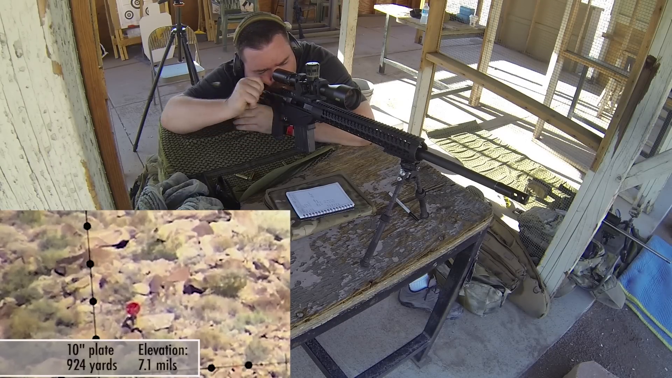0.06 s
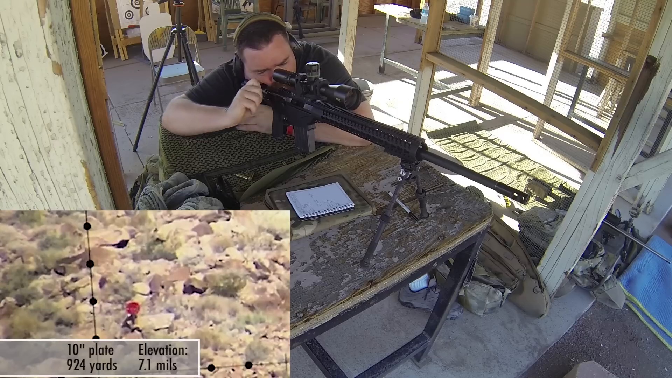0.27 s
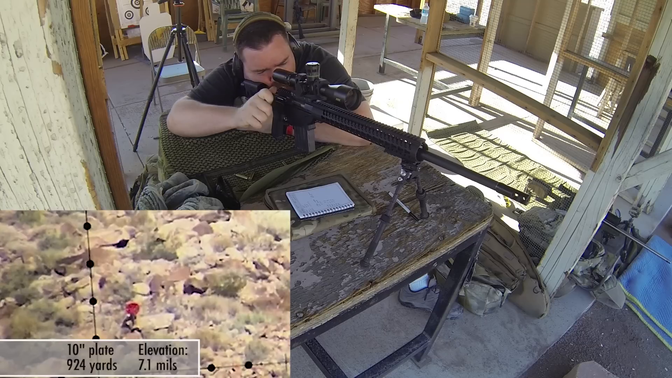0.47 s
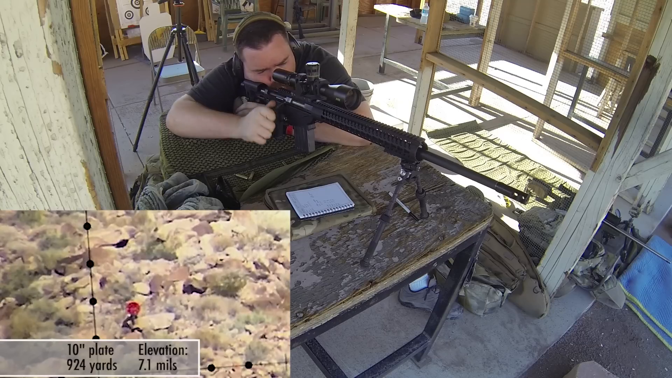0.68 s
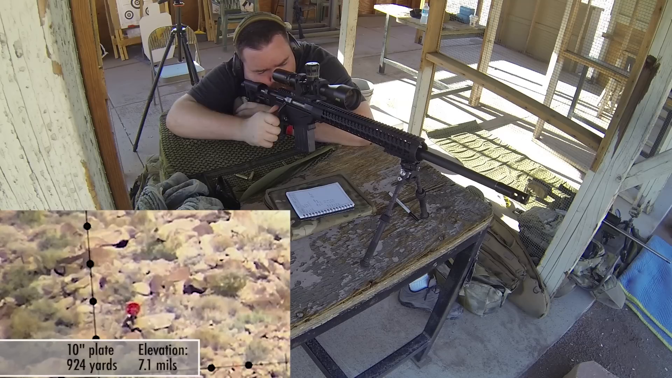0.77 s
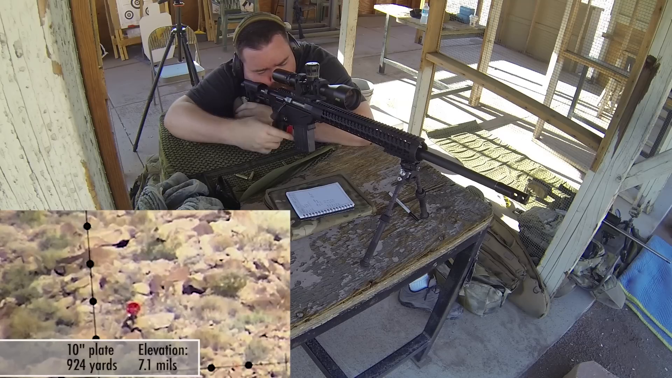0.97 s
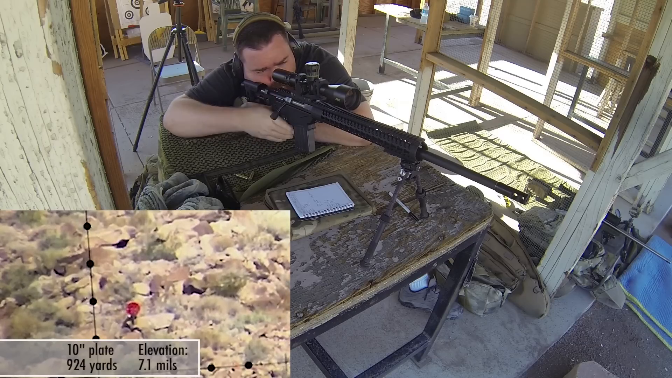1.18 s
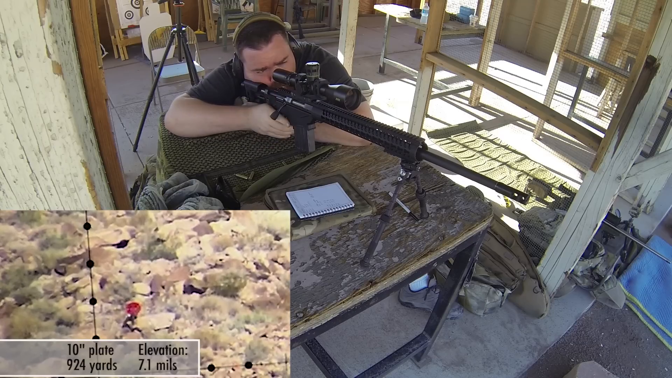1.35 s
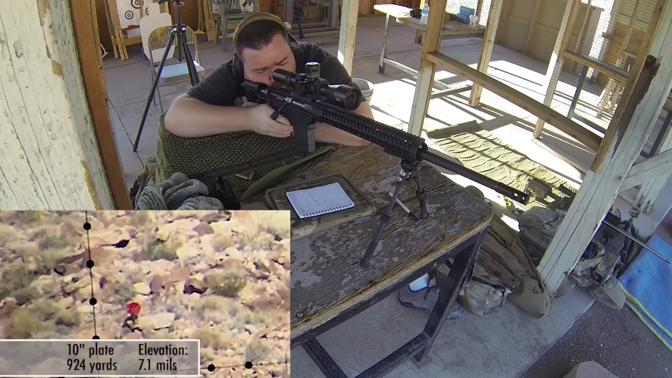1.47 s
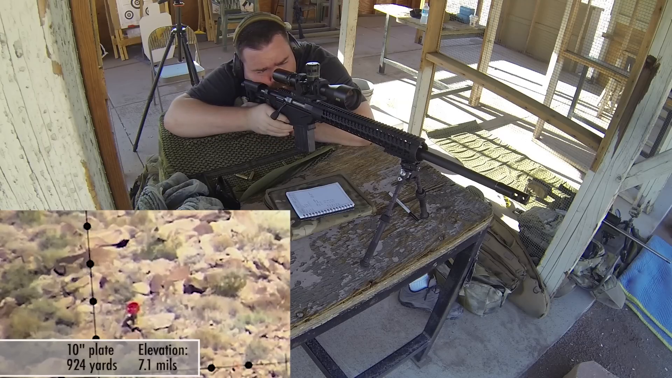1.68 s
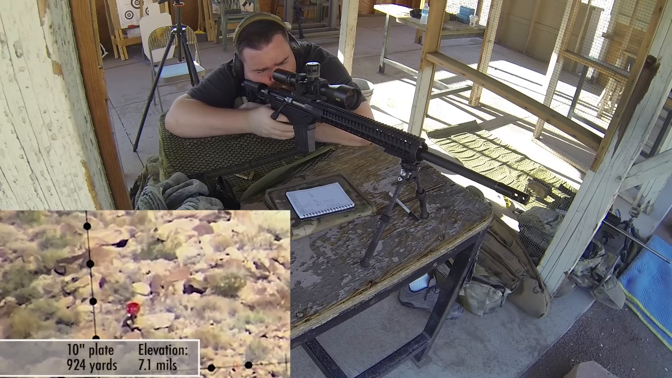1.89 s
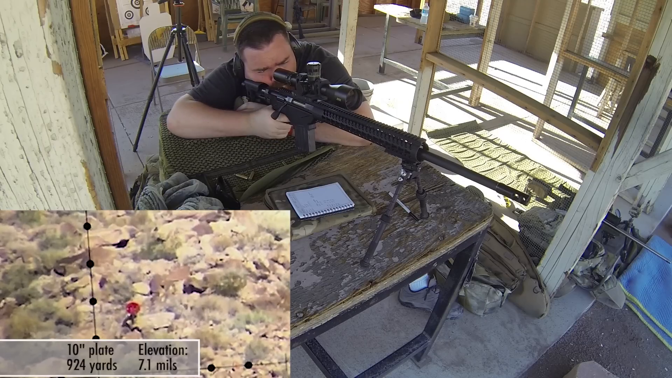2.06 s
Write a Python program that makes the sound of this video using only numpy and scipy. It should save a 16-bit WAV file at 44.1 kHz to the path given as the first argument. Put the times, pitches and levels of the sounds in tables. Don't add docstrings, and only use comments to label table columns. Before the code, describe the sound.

A rifle bolt is worked close by: steel scrapes and clacks back, then snaps home with a hard knock. An ejected brass case ticks and rings on the wooden bench, over light wind and faint insects.

```python
import sys
import numpy as np
from scipy import signal
from scipy.fft import rfft, irfft
from scipy.io import wavfile
from scipy.ndimage import uniform_filter1d

SR = 44100
rng = np.random.default_rng(int(sys.argv[2]) if len(sys.argv) > 2 else 0)


def store_pcm(level_fs):
    pcm = np.round(np.clip(level_fs, -1, 1) * 32767).astype(np.int16)
    wavfile.write(sys.argv[1], SR, np.atleast_2d(pcm).T)


def rack_gain(trim_db):
    fader = np.asarray(trim_db, float)
    return 10 ** (fader / 20)


N = 92610


def unit(x):
    return x / np.sqrt(np.mean(x ** 2))


def colour(x, points):
    point_hz, point_db = np.array(points, float).T
    hz = np.maximum(np.arange(2049) * SR / 4096, 1)
    level_db = np.interp(np.log(hz), np.log(point_hz), point_db)
    cepstrum = irfft(np.log(rack_gain(level_db)))
    cepstrum[1:2048] *= 2
    cepstrum[2049:] = 0
    response = irfft(np.exp(rfft(cepstrum)))
    return signal.fftconvolve(x, response / np.linalg.norm(response))[:N]


def ring(x, modes):
    t = np.arange(SR) / SR
    response = 0
    for hz, db, t60 in modes:
        decay = 1000. ** (-t / t60) / np.sqrt(t60)
        response = response + rack_gain(db) * np.sin(2 * np.pi * hz * t) * decay
    return signal.fftconvolve(x, response / np.linalg.norm(response))[:N]


def band(x, hz, kind):
    return signal.sosfilt(signal.butter(2, hz, kind, fs=SR, output="sos"), x)


def walk(rate_hz):
    hold = int(SR / rate_hz)
    steps = np.repeat(rng.standard_normal(N // hold + 1), hold)
    smooth = uniform_filter1d(uniform_filter1d(steps, hold), hold)
    return unit(smooth[:N])


def chatter(rows, attack_s, grit_db):
    t = np.arange(N) / SR
    unevenness = np.minimum(rng.exponential(size=N), 3)
    clicks = unit(rng.standard_normal(N) * rack_gain(grit_db * unevenness))
    power = 0
    for start_s, db, t60, *shares_db in rows:
        since = np.maximum(t - start_s, 0)
        env = rack_gain(db) * (1 - np.exp(-since / attack_s)) * rack_gain(-60 * since / t60)
        shares = rack_gain(np.array([0] + shares_db))[:, None]
        power = power + (env * shares) ** 2
    return clicks * np.sqrt(power)


def knocks(rows, rise_s):
    t = np.arange(N) / SR
    out = np.zeros(N)
    for start_s, db, hz, t60 in rows:
        since = np.maximum(t - start_s, 0)
        env = rack_gain(db - 60 * since / t60) * (1 - np.exp(-since / rise_s))
        out += env * np.sin(2 * np.pi * hz * since)
    return out


# pitch_hz, level_db (per Hz)
AIR_COLOUR = [(12, -65), (20, -4.5), (70, 0), (198, -15.5), (270, -21.5), (1370, -39.5), (5230, -42),
              (13200, -57), (16000, -58)]


def air():
    flicker_db, flicker_hz = 1.2, 12
    noise = unit(colour(rng.standard_normal(N), AIR_COLOUR)) * rack_gain(-44)
    rumble = band(noise, 340, "low")
    return noise + rumble * (rack_gain(flicker_db * walk(flicker_hz)) - 1)


def insects():
    cricket_hz, cricket_db, wobble, arch = 5080, -64.5, 0.01, .045
    rate_hz, first_s, pulse_s = 23.9, .0165, .0055
    chorus_hz, chorus_width_hz, chorus_db = 8900, 1300, -71
    swell_hz, swell_db = [6400, 13500], -11.5

    t = np.arange(N) / SR
    from_pulse_s = (((t - first_s) * rate_hz + .5) % 1 - .5) / rate_hz
    gate = np.exp(-.5 * (from_pulse_s / pulse_s) ** 2)
    hz = cricket_hz * (1 + wobble * walk(rate_hz) + arch * (gate - .5))
    tone = np.sin(2 * np.pi * np.cumsum(hz) / SR) * gate * rack_gain(1.5 * walk(rate_hz))

    between = (1 - gate) ** 2
    edges = [chorus_hz - chorus_width_hz / 2, chorus_hz + chorus_width_hz / 2]
    chorus = unit(band(rng.standard_normal(N), edges, "band"))
    swell = rack_gain(swell_db) * unit(band(rng.standard_normal(N), swell_hz, "band"))
    return rack_gain(cricket_db) * tone + rack_gain(chorus_db) * (chorus + swell) * between


# start_s, level_db
PUSH_LEVELS = [
    (0.0, -47.5),
    (0.086, -60),
    (0.136, -37),
    (0.328, -28.5),
    (0.626, -37.5),
    (0.654, -62),
    (0.676, -40.5),
    (1.288, -51),
    (1.3, -61),
]
# pitch_hz, level_db, t60_s
STOCK_MODES = [(100, -9.5, 0.3), (148, -6, 0.023), (189, 5, 0.051), (248.4, 0, 0.077), (327, -19.5, 0.048),
               (666, -24.5, 0.046), (740, -13, 0.016), (830, 8.5, 0.029), (1020, 7.5, 0.023),
               (1280, 5, 0.017), (1480, 6.5, 0.0073), (1800, 2, .02)]


def push():
    start_s, db = np.array(PUSH_LEVELS).T
    t = np.arange(N) / SR
    level = rack_gain(np.interp(t, start_s, db, right=-90) + 0.94 * walk(31.16))
    return ring(rng.standard_normal(N) * level, STOCK_MODES[:5])


# start_s, level_db, t60_s, dull_stock_share_db, bright_share_db
BOLT_CONTACTS = [(.001, -38.5, 0.26, 1.5, 3), (.032, -44, 0.1, 10, -31), (.134, -74.5, 0.46, 33, -3.5),
                 (.2045, -24.5, 0.13, 7.5, -1.5), (.209, -20.5, 0.064, -8, -7.5),
                 (.213, -23.5, 0.11, 13, -6), (.228, -28, 0.21, 17, -17), (.256, -35, 0.28, 16, -31),
                 (.313, -33.5, 0.074, 18, -8.5), (.3178, -18, 0.042, -6.5, 9.5), (.323, -15, 0.059, 2, 1.5),
                 (.3378, -14, 0.16, 0, 3), (.354, -14, 0.16, -1.5, 8), (.368, -19, 0.11, -4.5, -14),
                 (.3945, -10, 0.017, -16.5, -11), (.3995, -8.5, 0.038, -8.5, 6.5),
                 (.404, -19.5, 0.084, -25, -14), (.602, -50, 0.09, -2, -2), (.6187, -3.5, 0.014, -17, 12),
                 (.6237, -18, 0.01, -32, 19.5), (.6285, -23, 0.046, -33, 9), (.672, -38, 0.028, -19, -5),
                 (.678, -27.5, 0.093, -0.5, 0)]
# pitch_hz, level_db, t60_s
STEEL_MODES = [(1490, 3.5, 0.063), (1820, 0.5, 0.049), (2210, 7.5, 0.013), (2690, -42, .03),
               (3300, -18.5, 0.01), (5030, -22, 0.09), (5175, 4, 0.028), (5630, 2, 0.035), (6660, -26, .03),
               (8400, -8, 0.02), (8550, -16, 0.03)]
# pitch_hz, level_db (per Hz)
SCRAPE_COLOUR = [(200, -17.5), (400, -19), (850, -11.5), (1300, -1), (4700, -3), (8000, -14), (11000, -23),
                 (15500, -49.5)]


def bolt():
    plain, dull, bright = chatter(BOLT_CONTACTS, attack_s=0.00096, grit_db=-0.65)
    rub = plain + band(bright - plain, 5300, "high")
    steel = colour(rub, SCRAPE_COLOUR) + rack_gain(-15.5) * ring(rub, STEEL_MODES)
    thud = band(band(dull, 1940, "low"), 460, "high")
    return steel + thud + rack_gain(-11) * ring(dull, STOCK_MODES[4:])


# start_s, wall_level_db, rim_level_db, t60_s
BRASS_CHIMES = [(.066, -65, -90, .05), (.21, -35, -64, 0.17), (.279, -53, -73, .3), (.303, -72, -92, .1),
                (.828, -56, -47, .2), (.844, -54, -49, .3), (.856, -43.5, -46, 0.12), (.88, -57, -58, .3),
                (.898, -50.5, -62, .21), (.925, -56.5, -64, 0.31), (1.101, -51, -62, .37),
                (1.116, -36, -56, 0.25), (1.178, -54, -70, 0.43), (1.245, -45.5, -53, .5),
                (1.264, -41, -73, 0.19), (1.321, -67, -70, 0.56), (1.456, -45, -78, 0.3)]


def brass():
    wall_hz, wall_drift = 9785, .002
    rim_hz, rim_drift, rim_t60_share = 15340, .006, .5
    rise_s, flutter_db, flutter_hz = .007, 3.6, 90

    t = np.arange(N) / SR
    rows = np.array(BRASS_CHIMES)
    latest = np.maximum(np.searchsorted(rows[:, 0], t) - 1, 0)
    start_s, wall_db, rim_db, t60 = rows[latest].T
    since = np.maximum(t - start_s, 0)
    notes = ((wall_hz, wall_db, wall_drift, 1), (rim_hz, rim_db, rim_drift, rim_t60_share))
    out = 0
    for hz, db, drift, t60_share in notes:
        decay = (t > start_s) * rack_gain(db - 60 * since / t60 / t60_share)
        env = uniform_filter1d(decay, int(rise_s * SR))
        phase = 2 * np.pi * np.cumsum(hz * (1 + drift * walk(flutter_hz * 2))) / SR
        out = out + env * rack_gain(flutter_db * walk(flutter_hz)) * np.sin(phase)
    return out


# start_s, level_db, pitch_hz, t60_s
SLIDE_BUMPS = [(.136, -33, 760, .05), (.144, -32.5, 1012, 0.067), (.158, -39, 1020, 0.078),
               (.165, -33, 760, .06), (.184, -43, 968, 0.11), (.2137, 2, 1160, 0.0066),
               (.217, -17.5, 790, .03), (.2265, -10, 1020, .022), (.2265, -17, 2220, 0.022),
               (.233, -16.5, 1500, 0.046), (.239, -10.5, 716, 0.041), (.2555, -18, 750, 0.028),
               (.263, -18, 700, .03), (.274, -24, 820, 0.048), (.277, -21, 1385, 0.052),
               (.289, -19, 760, .03), (.301, -17, 690, 0.048), (.333, -19.5, 628, .05),
               (.374, -31, 816, 0.051)]


def slide_bumps():
    return knocks(SLIDE_BUMPS, rise_s=0.00073)


# start_s, level_db, pitch_hz, t60_s
LUG_KNOCKS = [(.2125, -19, 1500, .03), (.2204, -14, 4470, .025), (.318, -12.5, 4740, 0.011),
              (.325, -29, 1940, 0.0317), (.3378, -9, 7640, .006), (.341, -17, 2910, 0.033),
              (.3455, -12, 8020, 0.016), (.3545, -11.5, 2940, 0.02), (.3545, -17, 4810, .02),
              (.358, -13.5, 4480, 0.012), (.359, -15, 7500, 0.013), (.372, -19, 2237, .04),
              (.3997, -11, 5300, .02), (.4, -13.5, 1610, 0.014), (.4043, -11.5, 1496, 0.041),
              (.4045, -12, 5500, 0.014), (.417, -21.5, 5360, 0.033), (.602, -33, 1810, 0.011),
              (.6065, -30, 1700, .035), (.619, -24.5, 518, 0.027), (.621, -17, 1150, .02),
              (.6192, -3.5, 6730, 0.0095), (.6195, -3.5, 1705, 0.011), (.6205, -15.5, 3200, 0.011),
              (.623, -26, 340, 0.038), (.6233, -10.5, 8770, 0.0092), (.6235, -14, 5260, .015),
              (.6238, -6, 1515, .024), (.6275, -16, 3200, 0.011), (.627, -17, 8800, .01),
              (.6374, -26.5, 1490, 0.08), (.6783, -21, 4450, 0.017), (.679, -33, 1770, .03),
              (.681, -28, 1285, .04), (.7, -32, 1480, .06)]


def lug_knocks():
    return knocks(LUG_KNOCKS, rise_s=0.00034)


# start_s, level_db, t60_s, mouth_note_share_db
CASE_BOUNCES = [(.824, -28, 0.056, 7.5), (.8265, -22.5, 0.081, -9.5), (.831, -35, 0.27, -7),
                (1.095, -32.5, 0.063, 11.5), (1.108, -35, 0.11, -25), (1.243, -40.5, 0.14, -0.5),
                (1.32, -43.5, 0.15, -6), (1.374, -60, 0.046, 4), (1.455, -49.5, 0.07, -11),
                (1.545, -55.5, 0.062, -6.5), (1.64, -67, 0.099, 2), (1.748, -73, 0.036, -21)]
# pitch_hz, level_db, t60_s
MOUTH_MODES = [(1445, -8, 0.14), (1510, -2, 0.053), (1500, -6, 0.055), (5500, -4, .012)]
# pitch_hz, level_db (per Hz)
TICK_COLOUR = [(180, -25.5), (300, -18), (593, -20), (1510, -3.5), (2100, -8), (3950, -11), (5520, -7.5),
               (15200, -35.5), (16000, -47)]


def case():
    plain, mouth = chatter(CASE_BOUNCES, attack_s=0.0021, grit_db=1.5)
    return colour(plain, TICK_COLOUR) + rack_gain(-3.5) * ring(mouth, MOUTH_MODES)


# start_s, level_db, pitch_hz, t60_s
SHOULDER_TICKS = [(0.8306, -27, 5620, .03), (.831, -33, 8900, .02), (0.84, -31, 5640, .04),
                  (.853, -35, 5740, 0.059), (.864, -33.5, 5550, 0.036), (0.878, -43, 5580, .06),
                  (0.917, -46, 5570, .04), (1.096, -31.5, 5470, 0.059), (1.111, -31, 5500, .03),
                  (1.245, -48, 5050, 0.044), (1.25, -43, 4020, .05)]
# start_s, level_db, pitch_hz, t60_s
CASE_ROCKS = [
    (1.323, -38.5, 1400, 0.049),
    (1.342, -48.5, 1480, 0.13),
    (1.373, -38.5, 1385, 0.028),
    (1.393, -45.5, 1440, 0.046),
    (1.417, -50, 1410, 0.041),
]


def case_notes():
    rise_s = 0.00072
    return knocks(SHOULDER_TICKS, rise_s) + knocks(CASE_ROCKS, rise_s)


# pitch_hz, level_db, t60_s
SHELTER_BANDS = [(357, 1, 0.7), (1500, 1.5, 0.25), (5000, -9.5, 0.37), (11100, 1.5, 0.21)]


def shelter(x):
    gap_s = 0.039
    t = np.arange(SR // 2) / SR
    tail = 0
    for hz, db, t60 in SHELTER_BANDS:
        noise = band(rng.standard_normal(len(t)), [hz / 2, min(hz * 2, 20000)], "band")
        tail = tail + noise * rack_gain(db - 60 * t / t60)
    tail = tail * (1 - np.exp(-t / gap_s))
    return rack_gain(-13.5) * signal.fftconvolve(x, tail / np.linalg.norm(tail))[:N]


def scene():
    background = air() + insects() + push()
    rattle = bolt() + case()
    rifle_notes = slide_bumps() + lug_knocks()
    small_notes = case_notes()
    echo = shelter(rattle + rack_gain(-5) * (rifle_notes + small_notes))
    rough_db, rough_hz = 2.5, 350
    rough_notes = small_notes * rack_gain(rough_db * walk(rough_hz))
    return (background + rattle + brass() + rifle_notes + rough_notes + echo)[None]


def band_limit(x):
    return signal.sosfilt(signal.butter(12, 16170, fs=SR, output="sos"), x)


def record(dry):
    limit, top_hz = .8, 15300
    soft = limit * np.tanh(dry / limit)
    top_cut = signal.ellip(10, .5, 70, top_hz, fs=SR, output="sos")
    mix = signal.sosfilt(top_cut, soft)
    return band_limit(mix)


dry = scene()
out = record(dry)
store_pcm(out)
```